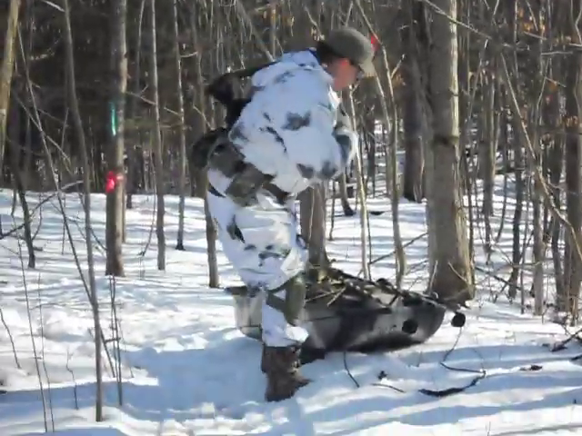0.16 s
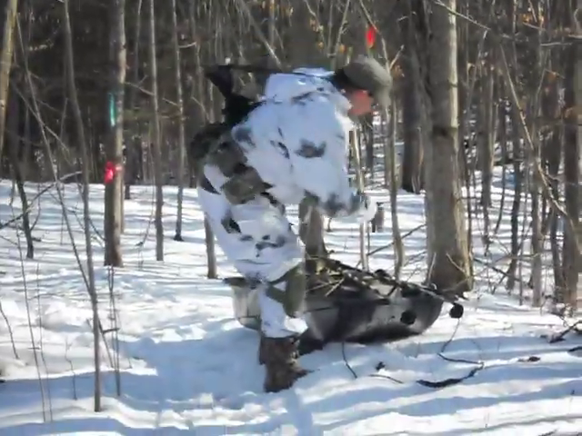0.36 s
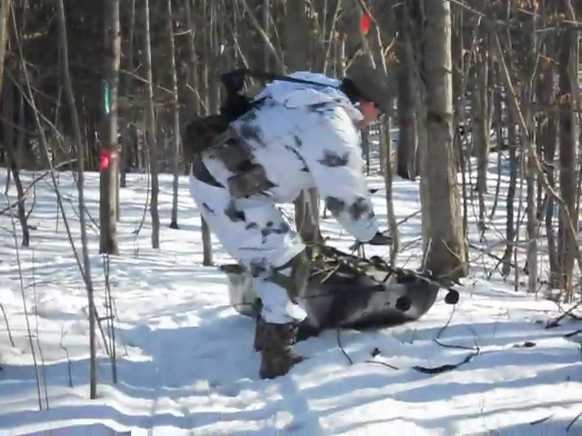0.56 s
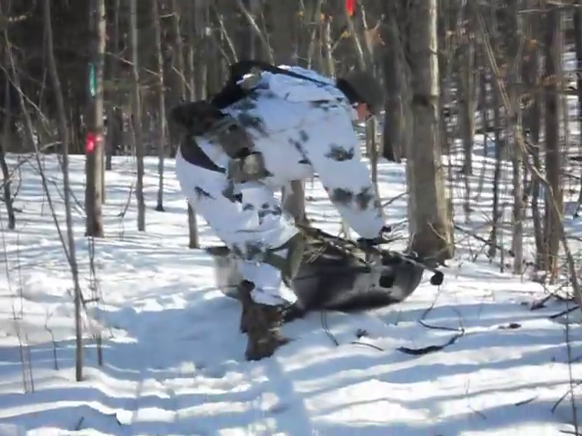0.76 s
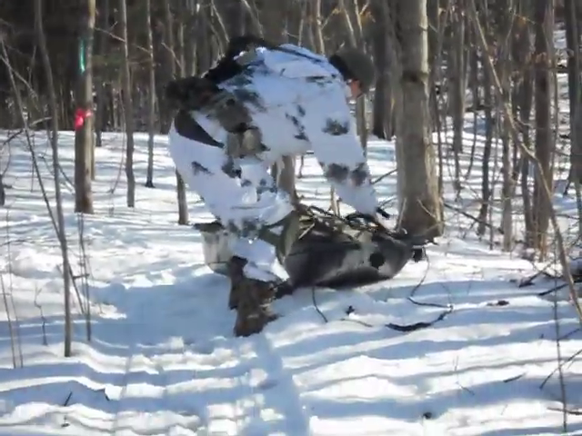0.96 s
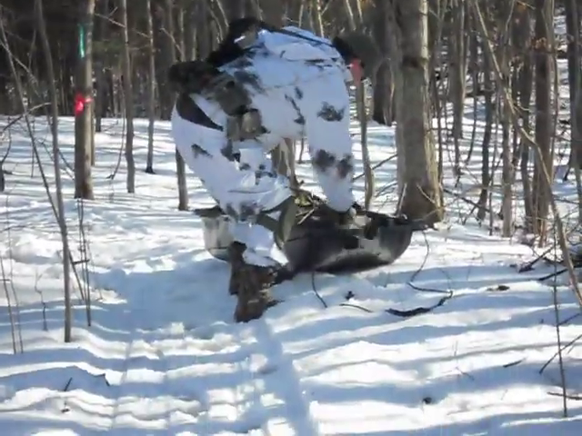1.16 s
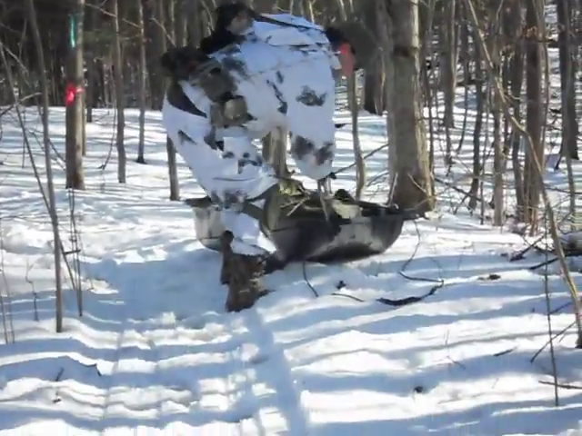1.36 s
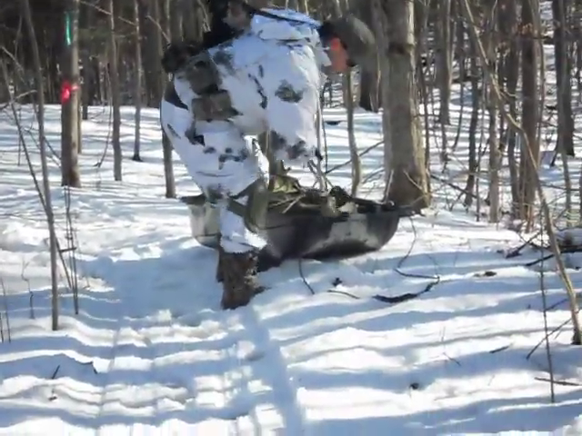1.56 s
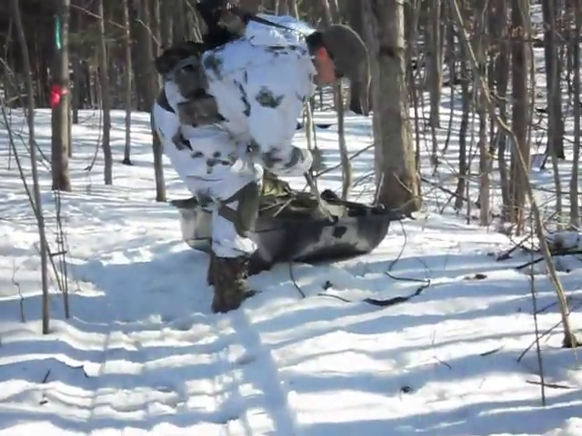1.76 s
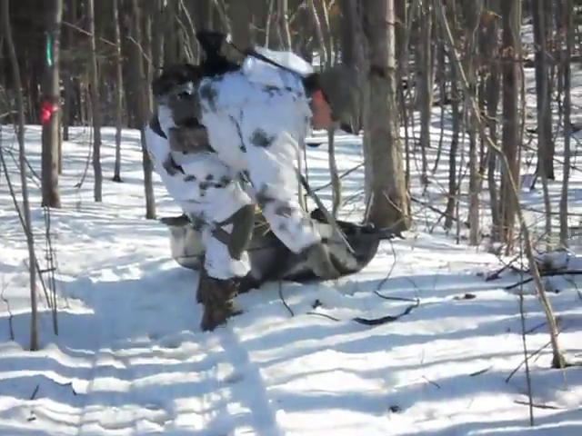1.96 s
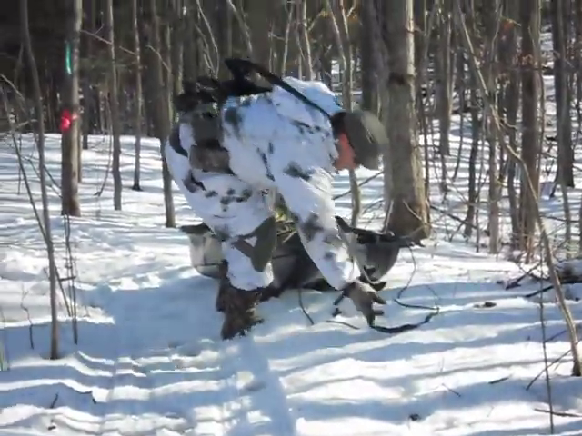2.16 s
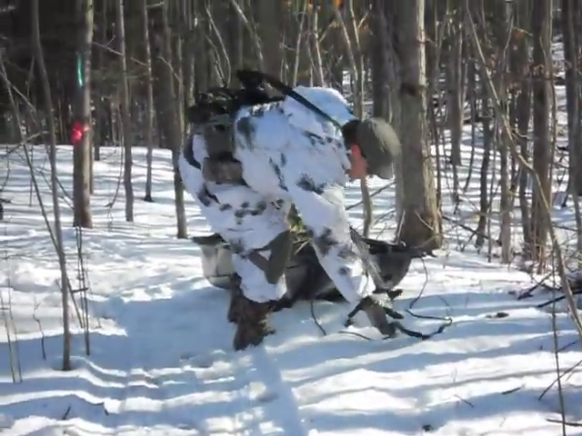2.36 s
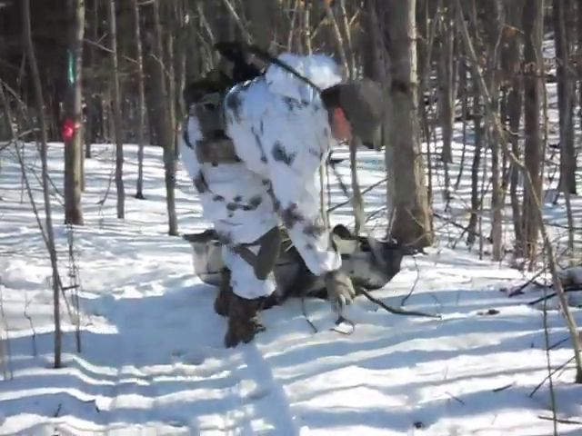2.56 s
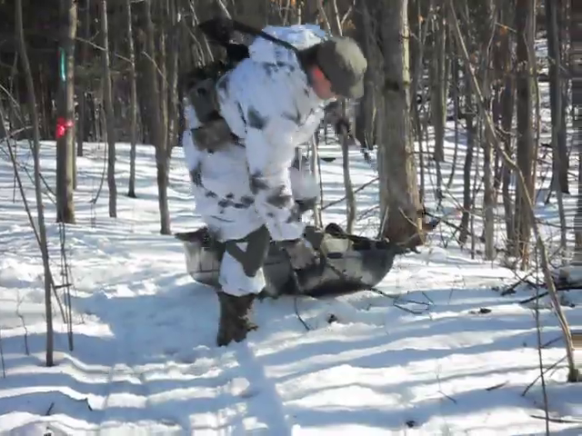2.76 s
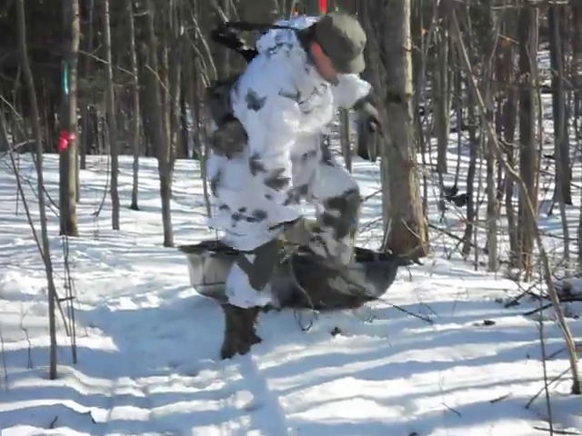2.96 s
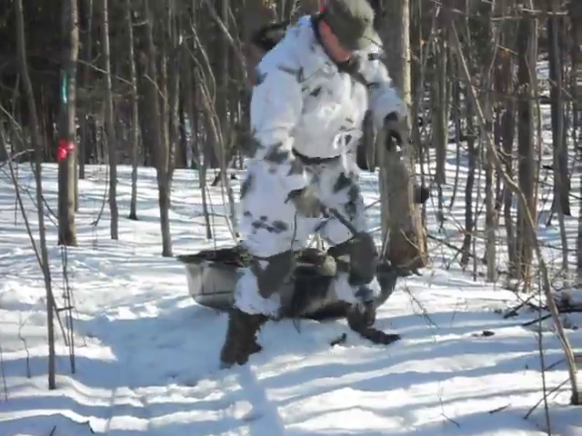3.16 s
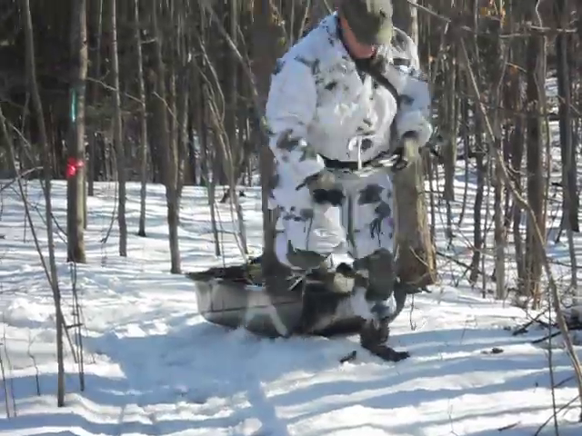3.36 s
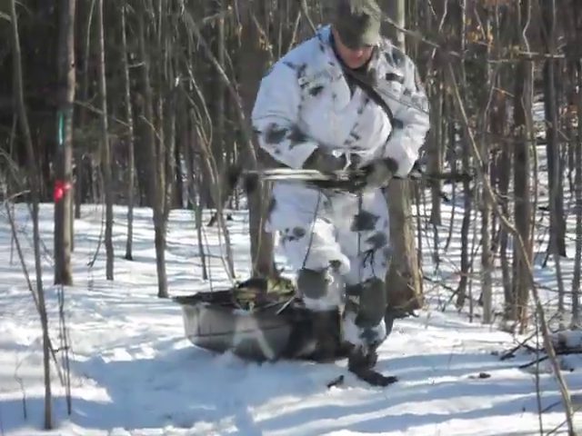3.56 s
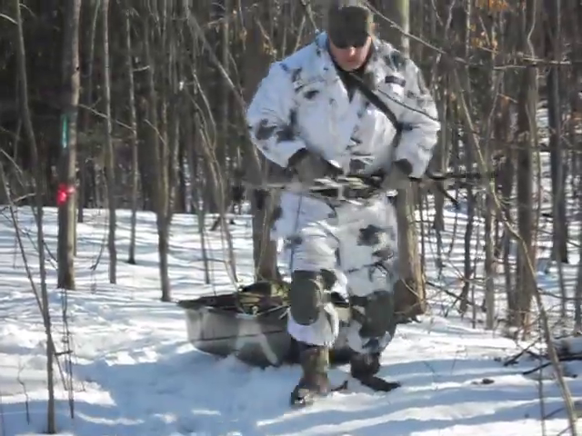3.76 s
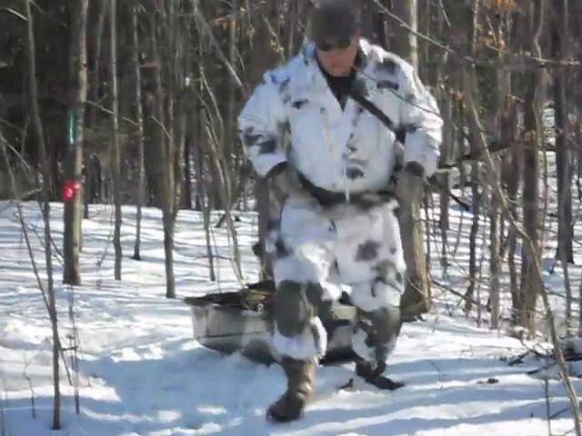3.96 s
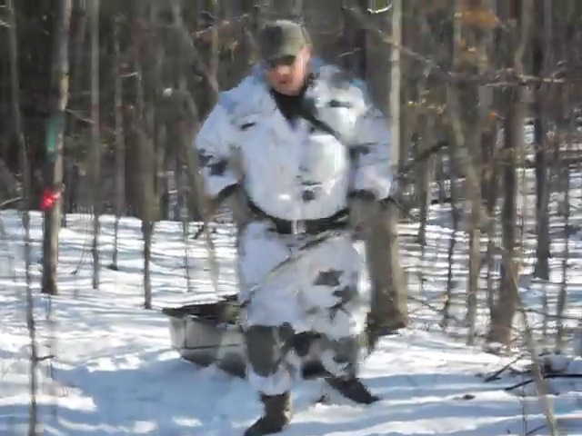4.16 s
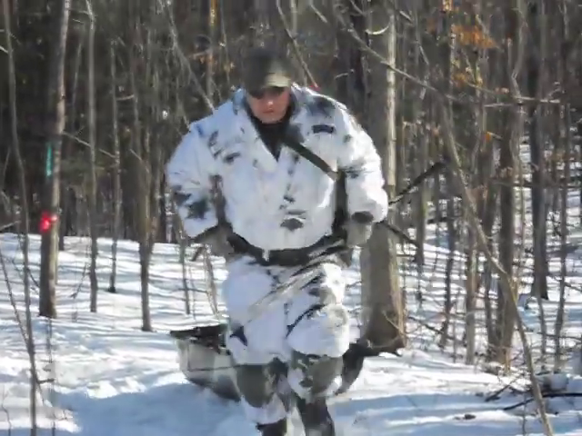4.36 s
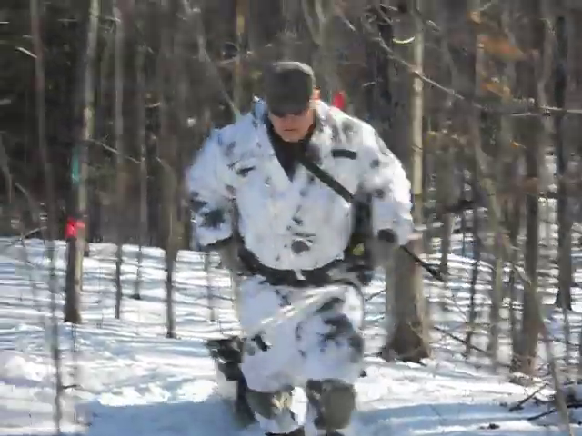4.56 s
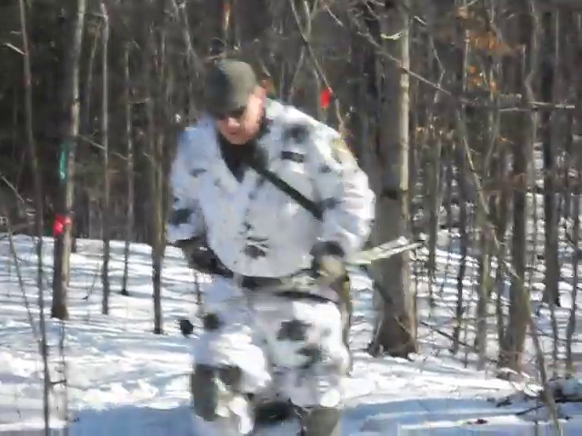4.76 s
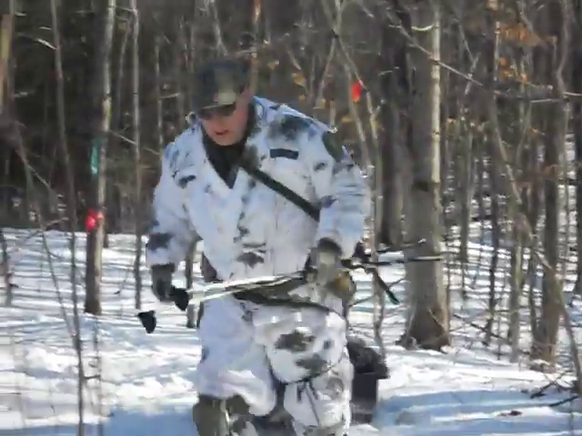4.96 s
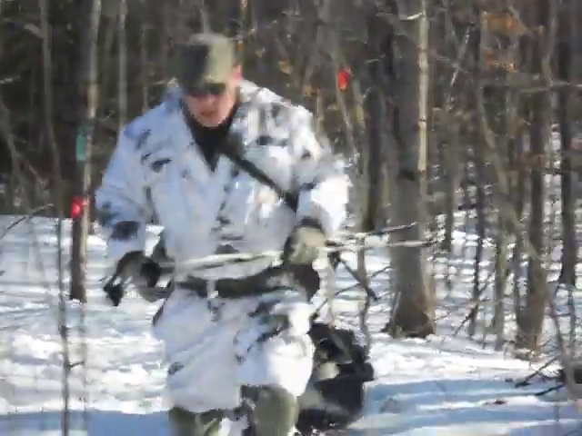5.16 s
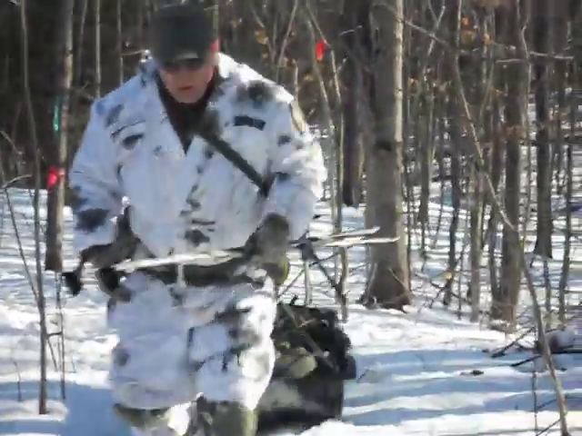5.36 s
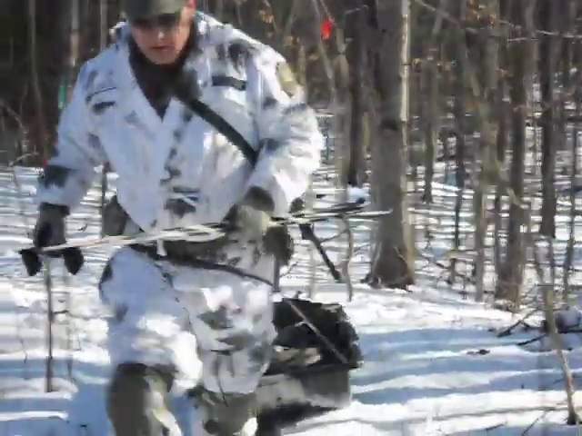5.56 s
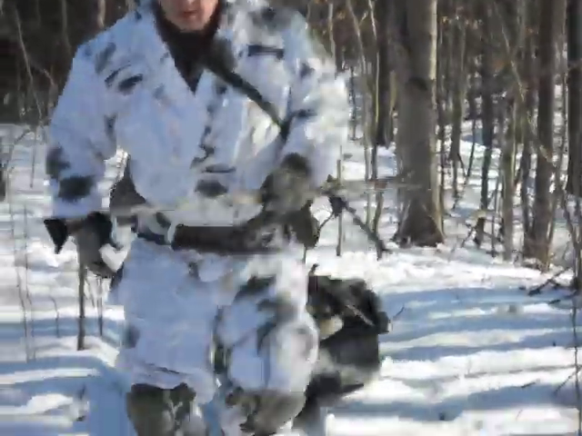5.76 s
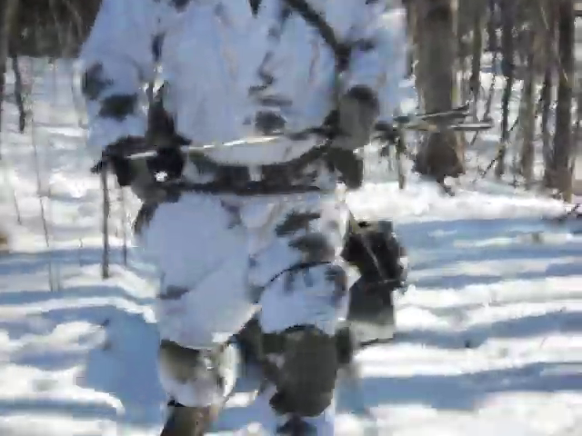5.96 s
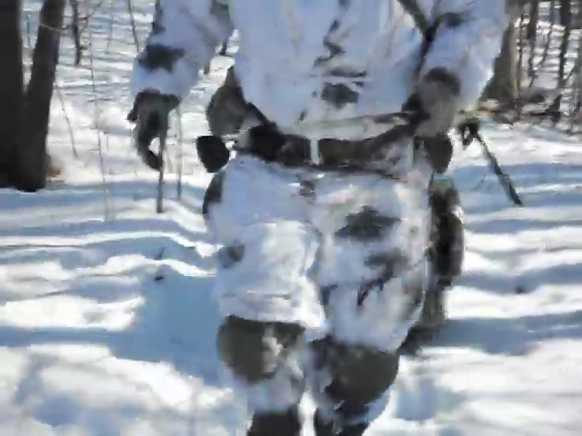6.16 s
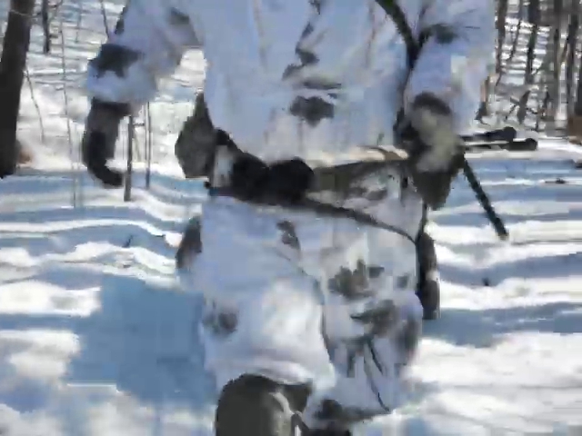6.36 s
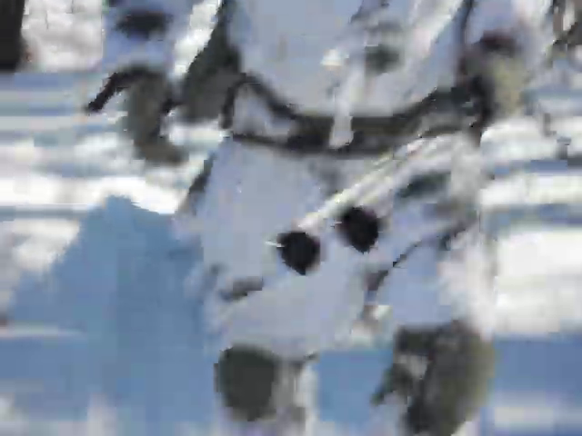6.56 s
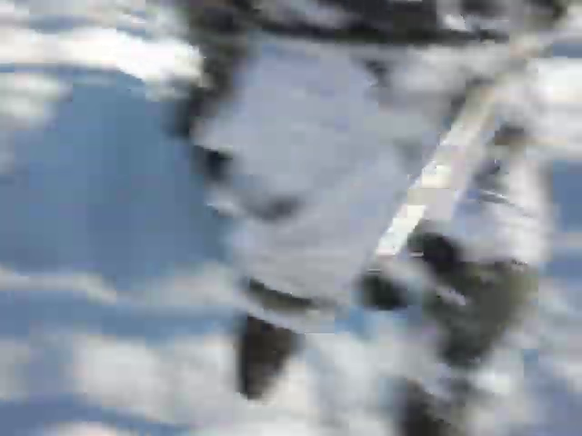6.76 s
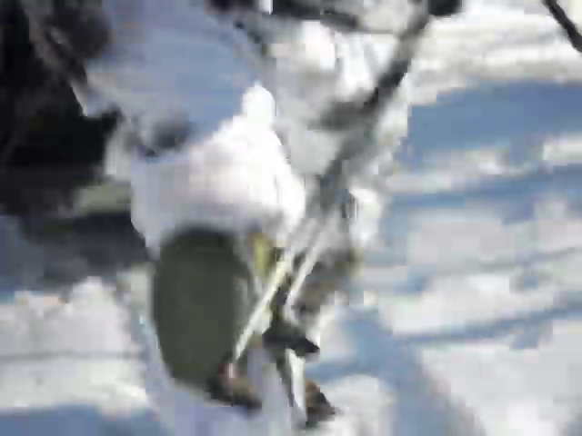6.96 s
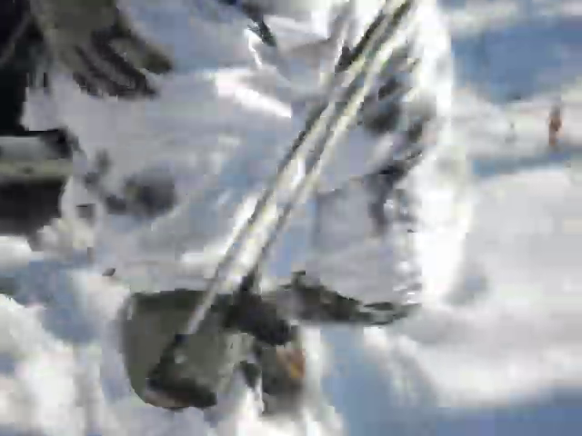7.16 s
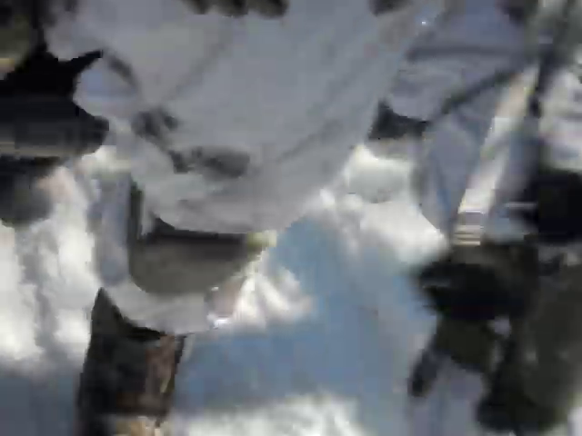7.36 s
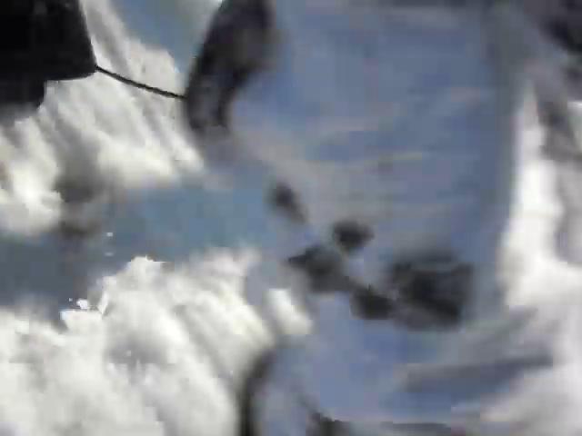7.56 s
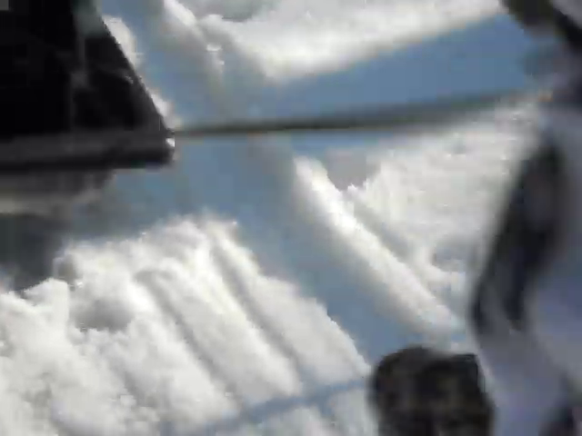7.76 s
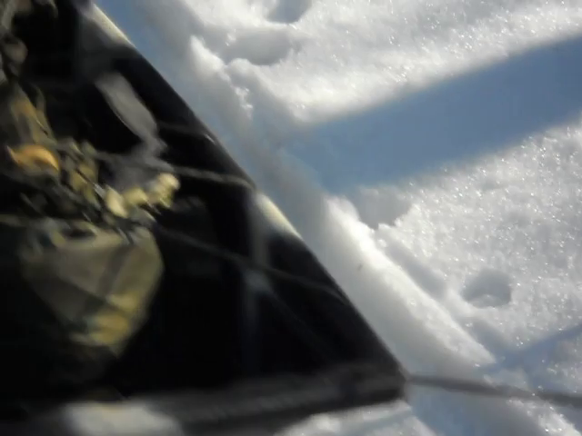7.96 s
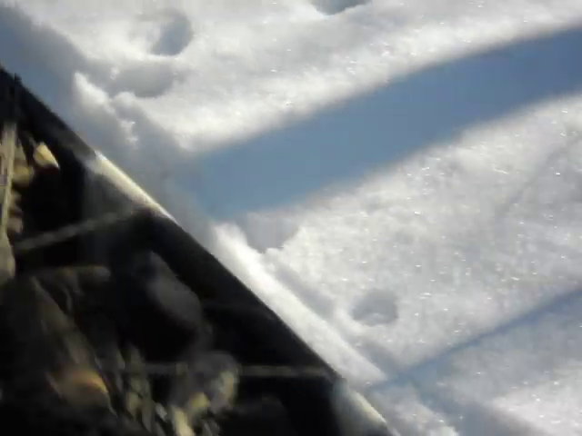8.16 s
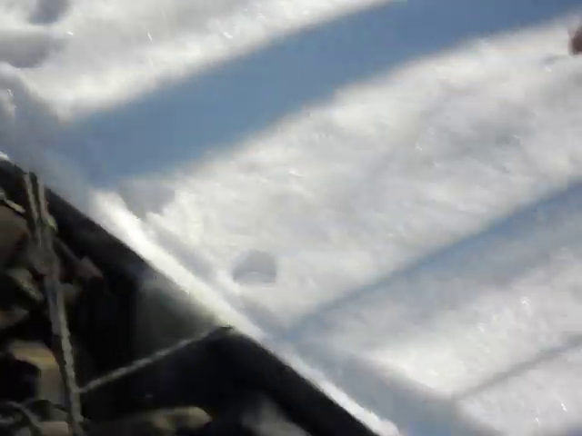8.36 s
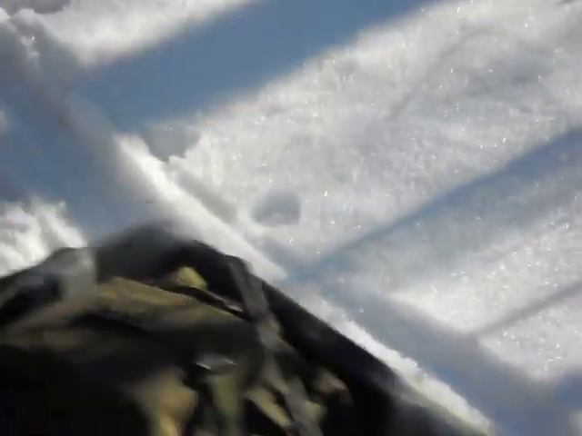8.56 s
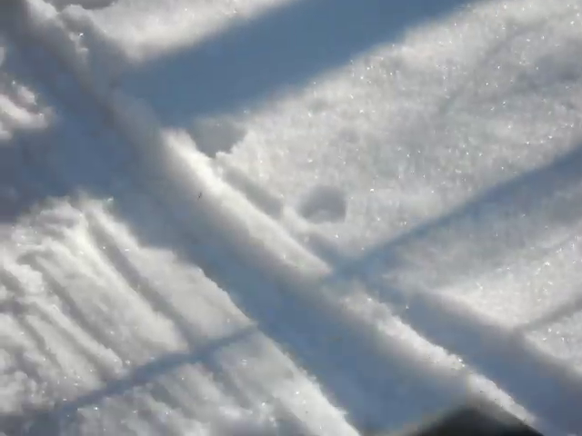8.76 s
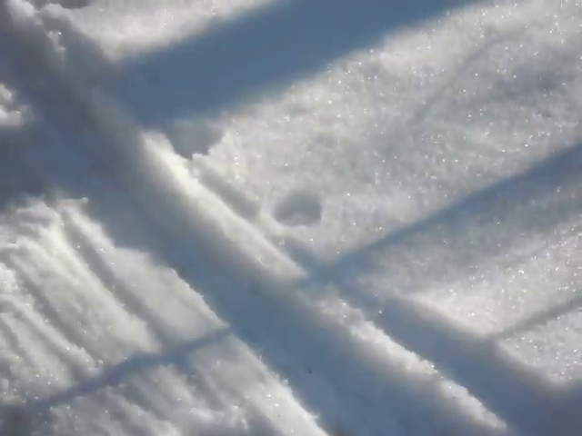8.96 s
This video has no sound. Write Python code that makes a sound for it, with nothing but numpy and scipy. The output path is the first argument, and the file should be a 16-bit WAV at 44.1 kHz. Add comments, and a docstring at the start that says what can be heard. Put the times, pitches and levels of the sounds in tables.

```python
"""A loaded plastic sled is hauled over snow past the microphone: countless grains hiss under the hull,
coarser slips scrape and rumble, and the colour turns as it comes up, draws level and slides by.
Gear clacks on the hull (struck modes), a clip jingles (decaying sines), boots thud, crust crunches and cracks,
snow squeaks and cloth rustles (resonant noise and grain bursts). Behind lie soft air noise and a thin whine.
"""
import sys
import numpy as np
from scipy import signal
from scipy.fft import rfft, irfft, next_fast_len
from scipy.io import wavfile
from scipy.ndimage import uniform_filter1d

SR = 44100
rng = np.random.default_rng(int(sys.argv[2]) if len(sys.argv) > 2 else 0)


def store_pcm(level_fs):
    """Save levels as 16-bit WAV."""
    pcm = np.round(np.clip(level_fs, -1, 1) * 32767).astype(np.int16)
    wavfile.write(sys.argv[1], SR, np.atleast_2d(pcm).T)


N = 397850
T_S = np.arange(N) / SR

# Tugs on the rope; the sled surges and slows. Each row: peak time in seconds, nominal hiss level in dB,
# half length (Gaussian sigma) in seconds, scrape in dB over the hiss, rumble in dB over the scrape.
TUGS = [(4.58, -30, 0.16, -7, -6), (5.007, -25, 0.19, -10.5, -8.5), (5.564, -18.5, 0.32, -12.5, -6),
        (6.166, -24, 0.093, -16, -3), (6.475, -21, 0.22, -5, -7), (7.01, -21.5, 0.15, -9, -4),
        (7.392, -21, 0.11, -6, -5), (7.6, -21.5, 0.17, -13.5, -7), (8.035, -33.5, 0.12, -11, -7),
        (8.253, -25, 0.091, -15.5, -6), (8.687, -20.5, 0.26, -7.5, -9)]
START_S, START_RISE_S = 4.29, .1  # the hull breaks loose
STALL_S, STALL_FALL_S = 7.81, .02  # the line jerks and the sled stops dead; time constant of the fall
SCRAPE_STRETCH = 1.36  # scrape and rumble surge length over hiss surge length
SCRAPE_LEAD_S = .017  # the hull digs in just before it runs fastest
# Side of the sled facing the microphone. Each row: time in seconds, side 0-3.
SIDE_FACING = [(4.3, 0), (6.65, 0), (7.0, 1), (7.75, 1), (7.95, 2), (8.38, 2), (8.6, 3)]
# Hiss spectrum from each side, 0 to 3. Each row: frequency in Hz, relative gain in dB.
HISS_HEAD_ON = [(1290, -24), (2200, -14.5), (2800, -20.5), (3180, -10), (3540, -10.5), (4170, -4.5),
                (4840, -5.5), (5380, -4), (5990, -7), (7100, -9.5), (8240, -5.5), (9160, -5), (10300, -10),
                (11200, -25.5), (12000, -29), (15600, -63), (22000, -120)]
HISS_ALONGSIDE = [(1290, -29), (2200, -13), (2700, -12), (3270, -16.5), (3940, -7.5), (4640, -3.5),
                  (5540, -4), (6850, -2.5), (7840, -5), (9290, 0.5), (10300, -2), (10600, -18),
                  (11200, -16), (12000, -26), (15600, -55), (22000, -120)]
HISS_BOW_CLOSE = [(1290, -40), (2200, -12), (2360, -11), (2570, -10), (2780, -20), (3540, -5.5), (4230, 0),
                  (6660, -2), (8470, 4), (9290, 2), (10300, -5), (11200, -19), (12000, -24), (15600, -57),
                  (22000, -120)]
HISS_HULL_CLOSE = [(1290, -47), (2200, -16), (2480, -4.5), (3560, -0.5), (4170, 0.5), (4600, -2.5),
                   (5820, 2), (7510, -2.5), (9700, 0.5), (10300, -2.5), (11200, -20), (12000, -21),
                   (15600, -53), (22000, -120)]
# Broad hull resonances in the scrape, one list per side. Each row: frequency in Hz, relative gain in dB.
SCRAPE_SPECTRA = [
    [(260, -53), (450, -6.5), (507, -11), (604, -3.5), (1100, 1.5), (1640, -5.5), (1890, -1.5),
     (2750, -8.5), (3000, -10), (3900, -26), (6600, -120)],
    [(260, -40), (450, -13), (549, -11.5), (964, 2.5), (1420, -3.5), (1640, -2), (1820, -3), (2460, -2.5),
     (3000, -12.5), (3900, -9), (6600, -120)],
    [(260, -42), (450, -19), (536, -5.5), (797, -0.5), (949, -1), (1350, 2), (2150, -3), (2360, -15),
     (3000, -4), (3900, -33), (6600, -120)],
    [(240, -32), (400, -2), (429, -6), (510, -10), (766, -3.5), (848, -5.5), (1310, -5), (2210, -16),
     (2600, -27), (3380, -39), (5720, -120)],
]
# Rumble spectrum, far and close. Each row: frequency in Hz, relative gain in dB.
RUMBLE_FAR = [(15, -40), (25, -7), (38, -15.5), (102, -7.5), (139, -4.5), (171, -2), (219, 1), (333, 1),
              (492, -11.5), (560, -14), (730, -27), (1230, -120)]
RUMBLE_CLOSE = [(24, -59), (40, -27), (238, -4.5), (276, -1), (389, -5), (424, -5.5), (520, -16),
                (680, -27), (1140, -120)]

# Poles, buckles and load striking the hull. Each row: start in seconds, level of the first 6 ms in dB,
# hollow body in dB over the clack, snap in dB over the clack, t60 in seconds, rebound in dB.
HULL_KNOCKS = [(.0405, -22.5, 2, 1, 0.034, -3.5), (.114, -26.5, 3, 14, 0.055, -8),
               (.129, -21.5, 3.5, 13, 0.029, 0), (.279, -34, -2, 3, .025, -14),
               (.3213, -33.5, 0, 20, 0.028, -14), (1.028, -36.5, -3, -12, .05, -8),
               (1.133, -16, -22, -0.5, 0.03, -3.5), (1.1815, -26.5, -15, -20, 0.05, -1),
               (1.293, -30, 3.5, 0, .02, -17), (1.341, -34.5, -6, -5, .024, -18),
               (1.567, -20.5, -9.5, -4, 0.042, -17), (1.617, -33.5, -5, -9, 0.054, -10),
               (1.68, -35, -1, -11, .045, -12), (2.8, -39, -3, -13, .03, -5),
               (3.438, -34.5, -1, -9, 0.022, -14), (3.514, -38, -2, -10, .02, -14),
               (4.0234, -27, 16, -2, .01, -24), (4.227, -31.5, 11, 1, .012, -22),
               (4.2543, -28.5, 9, 2, .02, -6.5), (4.8045, -19.5, -1, -6, 0.027, 0),
               (4.866, -21.5, 2, 12, 0.034, -6)]
# Ski poles clicking together, and the tow line jerking the bow. Columns as for the hull knocks.
POLE_CLICK = [(4.1435, -16, -7.5, 5.9, 0.011, -22)]
BOW_JERK = [(7.817, -17.5, -9, 6.5, .017, -28)]
# Modes of hull, poles and bow. Each row: frequency in Hz, width in Hz, gain in dB.
HULL_MODES = [(890, 470, -1), (1510, 90, -24), (1934, 39, -5), (2380, 200, -11.5), (2610, 190, -20),
              (2910, 92, -13), (4400, 240, -6), (5260, 220, -4), (5870, 260, -20)]
POLE_MODES = [(2750, 370, 11.5), (3470, 270, 9), (4200, 350, 12), (5300, 360, 9)]
BOW_MODES = [(1680, 157, 13.5), (4690, 300, 1), (6150, 280, 6), (8400, 400, 1)]
REBOUND_S = .0075  # a struck piece of gear lands a second time
RATTLE_REF_S = .035  # blows that ring longer than this set more gear rattling, shorter ones less

# Touches of a small metal clip. Each row: start in seconds, level in dB before the mode gains.
JINGLES = [(0.2229, -22), (0.236, -16.5), (0.2484, -22)]
CLIP_MODES = [(7100, -7, 0.03), (8650, -16, .04), (9300, -10, 0.039)]

# Boots or load landing on the crust. Each row: thud start in seconds, thud peak in dB, thud centre in Hz,
# crunch level in dB, crunch centre in Hz.
STEPS = [(.13, -28, 253, -35, 1500), (.908, -27, 229, -52, 1000), (1.979, -34, 307, -38, 3800),
         (3.918, -27.5, 170, -48, 1500), (4.321, -31, 333, -35.5, 6000), (5.44, -31, 220, -20.5, 4500),
         (6.371, -20.5, 221, -20, 1200), (6.677, -15, 178, -23.5, 3500), (6.728, -21, 200, -20, 4000),
         (7.036, -16.5, 218, -18.5, 990), (8.245, -20.5, 292, -34, 6000), (8.939, -21, 330, -35, 1500)]
THUD_S = .028
CRUNCH_LAG_S, CRUNCH_S = .013, .018  # peak after the thud starts; length
# Small plates of crust snapping under the hull. Each row: peak time in seconds, level in dB.
CRACKS = [(5.35, -21), (6.655, -20), (6.777, -21.5), (7.933, -29), (8.13, -31), (8.241, -28)]
CRACK_HZ, CRACK_S = 5000, .01
# Cold snow squeaking as boot or hull packs it. Each row: peak time in seconds, level in dB, centre in Hz.
SQUEAKS = [(4.824, -22.5, 1290), (4.888, -28, 1040), (5.24, -27.5, 1790), (5.28, -29, 790),
           (5.45, -29.5, 1380), (6.25, -27, 1360), (6.6, -21, 1230), (7.933, -33.5, 1580),
           (8.25, -30, 1280), (8.61, -24.5, 1220), (8.755, -22.5, 780)]
SQUEAK_S = .025
# Load shifting and rubbing in the hull. Each row: peak time in seconds, level in dB, centre in Hz,
# length in seconds.
RUBS = [(1.11, -42.5, 1000, 0.17), (1.05, -42, 230, .04), (1.16, -38.5, 230, .06), (3.14, -42, 850, 0.088),
        (4.03, -41, 2500, .26), (3.95, -44, 780, .27), (6.42, -31, 490, .07), (8.79, -25, 410, 0.024)]
# Snow suit swishing past the microphone. Each row: peak time in seconds, level in dB, length in seconds.
RUSTLES = [(3.13, -39, 0.092), (3.801, -39.5, .13), (4.103, -38.5, 0.26), (7.144, -13.5, 0.037),
           (7.196, -16.5, 0.02), (7.265, -18, .02), (7.31, -20.5, .02), (7.354, -18, .022),
           (7.426, -19, .022), (7.489, -17, .023)]
RUSTLE_HZ = 7940
# Stirred air buffeting the microphone as the walker passes. Each row: peak time in seconds, level in dB,
# centre in Hz, length in seconds.
BUFFETS = [(6.7, -36, 55, 0.14), (7.53, -43, 44.5, 0.061), (7.66, -53, 40, 0.071)]

# Still air of the woods, before the later fade. Each row: time in seconds, level in dB.
AIR_LEVEL = [(0, -38.5), (.55, -41), (1.13, -40.5), (1.34, -45.5), (1.7, -45), (2.2, -43.5), (2.7, -42),
             (3.7, -40.5)]
# Air spectrum. Each row: frequency in Hz, relative gain in dB.
AIR_SPECTRUM = [(12, -29), (20, -4), (76, -15.5), (276, -11), (380, -12.5), (685, -11.5), (742, -11),
                (1230, -14), (1490, -16), (1790, -16), (6150, -20.5), (8030, -22), (10200, -23.5),
                (12000, -50), (15600, -77), (22000, -120)]
WHINE_HZ, WHINE_DB = 7870, -60.5
TOP_HZ = 12480  # upper band edge of the output


def undb(db):
    """Decibels to gain."""
    return 10 ** (np.asarray(db) / 20)


def unit(x):
    """Scale to rms 1."""
    return x / np.sqrt(np.mean(x ** 2) + 1e-20)


def curve(rows):
    """Second column of a table, interpolated over time to one value per sample."""
    s, values = np.transpose(rows)
    return np.interp(T_S, s, values)


def add(out, start_s, sound):
    """Mix a sound in at its start time, cut at the end of the scene."""
    i = max(int(start_s * SR), 0)
    out[i:i + len(sound)] += sound[:max(N - i, 0)]


def colour(x, spectrum):
    """Filter to a spectrum interpolated over log frequency; rms 1."""
    size = next_fast_len(len(x))
    hz, db = np.transpose(spectrum)
    f_hz = np.maximum(np.fft.rfftfreq(size, 1 / SR), 1)
    gain = undb(np.interp(np.log(f_hz), np.log(hz), db, left=-90, right=-90))
    return unit(irfft(rfft(x, size) * gain, size)[:len(x)])


def resonate(x, hz, width_hz):
    """Two-pole band-pass, gain 1 at the centre."""
    b, a = signal.iirpeak(hz, hz / min(width_hz, SR / 4), fs=SR)
    return signal.lfilter(b, a, x)


def walk(rate_hz):
    """Smooth random curve, rms 1: held random values under a moving average."""
    hold = max(int(SR / rate_hz), 2)
    steps_held = np.repeat(rng.standard_normal(N // hold + 1), hold)
    return unit(uniform_filter1d(steps_held, hold)[:N])


def grains(size, per_s, spread_db):
    """Snow crystals breaking: random ticks of very unequal strength and either sign; rms 1."""
    hit = rng.random(size) < per_s / SR
    sign = rng.choice([-1, 1], size)
    strength = undb(spread_db * np.minimum(rng.standard_normal(size), 2.5))
    return unit(hit * sign * strength)


def swells(rows, per_s, width):
    """Grain bursts in one broad resonance, swelling and fading; width is a share of the centre."""
    out = np.zeros(N)
    for peak_s, db, hz, length_s in rows:
        t = np.arange(-2 * length_s, 2 * length_s, 1 / SR)
        crackle = resonate(grains(len(t), per_s, spread_db=5.0), hz, width * hz)
        crackle = unit(resonate(crackle, hz, 2 * width * hz))
        swell = np.exp(-2 * (t / length_s) ** 2)
        add(out, peak_s + t[0], undb(db) * crackle * swell)
    return out


def surges():
    """Levels of hiss, scrape and rumble: tugs overlap in power; the stall cuts off those before it."""
    power = np.zeros((3, N))
    for peak_s, hiss_db, half_s, scrape_db, rumble_db in TUGS:
        stop = 1
        if peak_s < STALL_S:
            stop = np.exp(-np.maximum(T_S - STALL_S, 0) / STALL_FALL_S)
        run = np.exp(-.5 * ((T_S - peak_s) / half_s) ** 2)
        dig = np.exp(-.5 * ((T_S - peak_s + SCRAPE_LEAD_S) / (half_s * SCRAPE_STRETCH)) ** 2)
        hiss = undb(hiss_db) * stop * run
        scrape = undb(hiss_db + scrape_db) * stop * dig
        power += np.array([hiss, scrape, scrape * undb(rumble_db)]) ** 2
    return np.sqrt(power) * np.clip((T_S - START_S) / START_RISE_S, 0, 1)


def blend(x, spectra, side):
    """The same grains heard from each side of the sled, faded from one side to the next."""
    shares = [np.clip(1 - abs(side - k), 0, 1) ** .5 for k in range(len(spectra))]
    return sum(w * colour(x, s) for w, s in zip(shares, spectra)) / sum(shares)


def sled():
    """Fine grains hiss under the hull; coarser slips scrape and rumble, all in the same uneven judder."""
    hiss_level, scrape_level, rumble_level = surges()
    side = curve(SIDE_FACING)
    close = np.clip(side - 1, 0, 1)
    # close by, single crystals and slips stand out of the wash
    near = np.interp(T_S, [5.3, 6.5], [0, 1])
    crystals = grains(N, per_s=18000, spread_db=3.5)
    crystals += (.12 + .27 * near) * grains(N, per_s=610, spread_db=2.5)
    slips = grains(N, per_s=6000, spread_db=2.5)
    slips += (.22 + .28 * near) * grains(N, per_s=160, spread_db=1.5)
    hiss = blend(crystals, [HISS_HEAD_ON, HISS_ALONGSIDE, HISS_BOW_CLOSE, HISS_HULL_CLOSE], side)
    scrape = blend(slips, SCRAPE_SPECTRA, side)
    rumble = blend(grains(N, per_s=700, spread_db=3.0), [RUMBLE_FAR, RUMBLE_CLOSE], close)
    # the hull catches and lets go on the uneven crust
    judder = walk(rate_hz=55) * (.95 + .26 * near)
    hiss *= hiss_level * undb(1.1 * judder + .8 * near * walk(rate_hz=150))
    scrape *= scrape_level * undb(1.08 * judder)
    rumble *= rumble_level * undb(1.3 * judder)
    return hiss + scrape + rumble


def knocks(rows, modes, chatter, direct, rattle_db, rattle_t60_s):
    """A sharp contact, its rebound and a dying chatter ring the damped modes; loose gear rattles on."""
    out, t = np.zeros(N), np.arange(SR // 4) / SR
    for start_s, db, body_db, snap_db, t60_s, rebound_db in rows:
        dying = undb(-60 * t / t60_s)
        dying += (t >= REBOUND_S) * undb(rebound_db - 60 * np.abs(t - REBOUND_S) / t60_s)
        rattle = t60_s / RATTLE_REF_S * undb(rattle_db - 60 * t / rattle_t60_s)
        push = chatter * rng.standard_normal(len(t)) * np.hypot(dying, rattle)
        push[0] = 1
        push[int(REBOUND_S * SR)] = undb(rebound_db)
        ringing = sum(undb(g) * resonate(push, hz, w) for hz, w, g in modes)
        push = direct * push + ringing
        # place and hardness of the blow share it among hollow body, clack and snap
        hit = np.zeros(len(t))
        for hz, width_hz, gain_db in [(807, 390, body_db), (2450, 2700, 0), (5500, 9200, snap_db)]:
            band = resonate(resonate(push, hz, width_hz), hz, width_hz)
            hit += undb(gain_db) * unit(band)
        onset_rms = np.sqrt(np.mean(hit[t < .006] ** 2))
        add(out, start_s, undb(db) * hit / onset_rms)
    return out


def steps():
    """A soft push swells and dies in a low resonance, and the crust crunches under it."""
    out, t = np.zeros(N), np.arange(SR // 8) / SR
    for start_s, db, hz, _, _ in STEPS:
        push = rng.standard_normal(len(t)) * t * np.exp(-5.5 * t / THUD_S)
        thud = resonate(resonate(push, hz, .36 * hz), hz, 2.0 * hz)
        add(out, start_s, undb(db) * thud / abs(thud).max())
    crunches = [(s + CRUNCH_LAG_S, db, hz, CRUNCH_S) for s, _, _, db, hz in STEPS]
    return out + swells(crunches, per_s=4000, width=1.0)


def cracks():
    """Crust plates snap: very short, bright bursts of coarse grains."""
    return swells([(s, db, CRACK_HZ, CRACK_S) for s, db in CRACKS], per_s=4000, width=1.3)


def squeaks():
    """Sparse slips of packed snow in a narrow resonance."""
    return swells([(s, db, hz, SQUEAK_S) for s, db, hz in SQUEAKS], per_s=1000, width=.45)


def jingles():
    out, t = np.zeros(N), np.arange(SR // 8) / SR
    for start_s, db in JINGLES:
        for hz, gain_db, t60_s in CLIP_MODES:
            detuned_hz = hz * (1 + .004 * rng.standard_normal())
            ring = undb(db + gain_db - 60 * t / t60_s) * np.sin(2 * np.pi * detuned_hz * t)
            add(out, start_s, ring)
    return out


def rubs():
    """The load rubs in the hull: grain swells in broad resonances."""
    return swells(RUBS, per_s=2800, width=.67)


def rustles():
    """Stiff cloth rubs on itself: dense, bright grains, low-passed."""
    cloth = swells([(s, db, RUSTLE_HZ, length_s) for s, db, length_s in RUSTLES], per_s=14000, width=1.0)
    return signal.sosfilt(signal.butter(7, 10300, fs=SR, output="sos"), cloth)


def buffets():
    """Stirred air pushes on the microphone: very low grain swells."""
    return swells(BUFFETS, per_s=2800, width=.72)


def woods():
    """Soft air noise with a wavering bass, fading as the sled nears, and a thin high whine."""
    air = colour(rng.standard_normal(N), AIR_SPECTRUM)
    air += resonate(air, 38, 50) * .47 * walk(rate_hz=4.97)
    fade = np.interp(T_S, [4.5, 7.8], [1, .4])
    whine = resonate(rng.standard_normal(N), WHINE_HZ, 110)
    whine = unit(resonate(whine, WHINE_HZ, 110))
    return air * undb(curve(AIR_LEVEL)) * fade + undb(WHINE_DB) * whine


def scene():
    """The sliding sled, handling and steps in the quiet woods."""
    gear = knocks(HULL_KNOCKS, HULL_MODES, chatter=.19, direct=.38, rattle_db=-15, rattle_t60_s=.4)
    gear += knocks(POLE_CLICK, POLE_MODES, chatter=.25, direct=.18, rattle_db=-13, rattle_t60_s=.096)
    gear += knocks(BOW_JERK, BOW_MODES, chatter=.2, direct=.47, rattle_db=-27, rattle_t60_s=.06)
    contacts = gear + steps() + cracks() + squeaks() + jingles() + rubs()
    # contacts carry little of the highest treble
    contacts = signal.sosfilt(signal.butter(14, 10250, fs=SR, output="sos"), contacts)
    mix = sled() + contacts + rustles() + buffets() + woods()
    return mix[None]


def record(dry):
    """Round the sharpest peaks towards a ceiling of 0.7, then cut the top steeply."""
    rounded = dry / (1 + (dry / .7) ** 6) ** (1 / 6)
    return signal.sosfilt(signal.ellip(14, .2, 80, TOP_HZ, fs=SR, output="sos"), rounded)


dry = scene()
out = record(dry)
store_pcm(out)
```